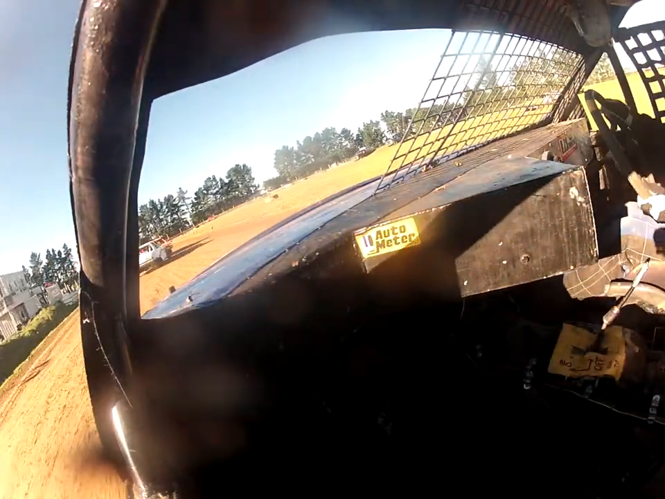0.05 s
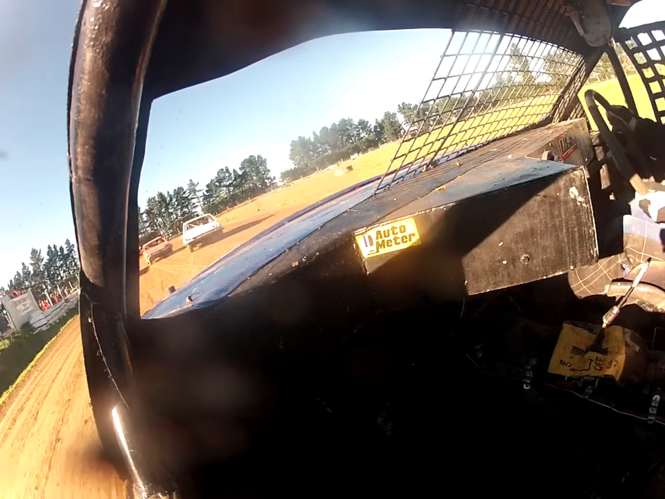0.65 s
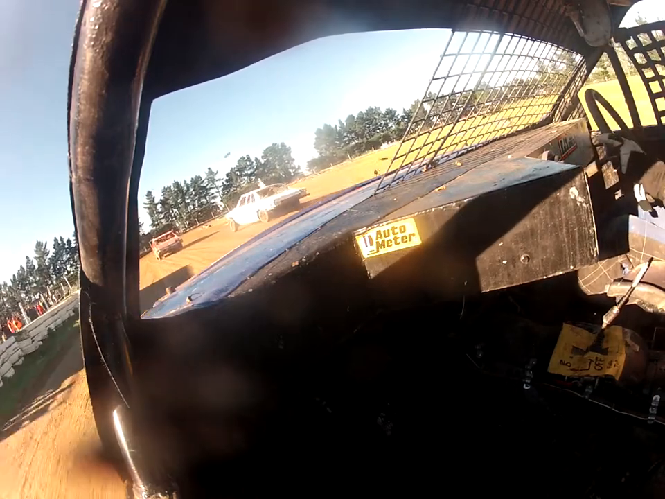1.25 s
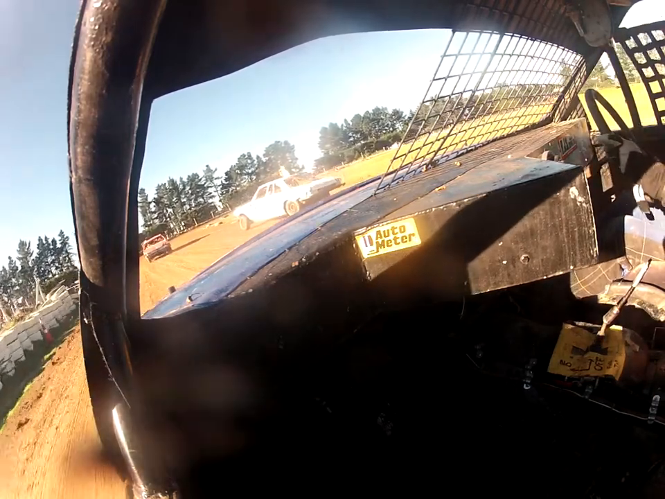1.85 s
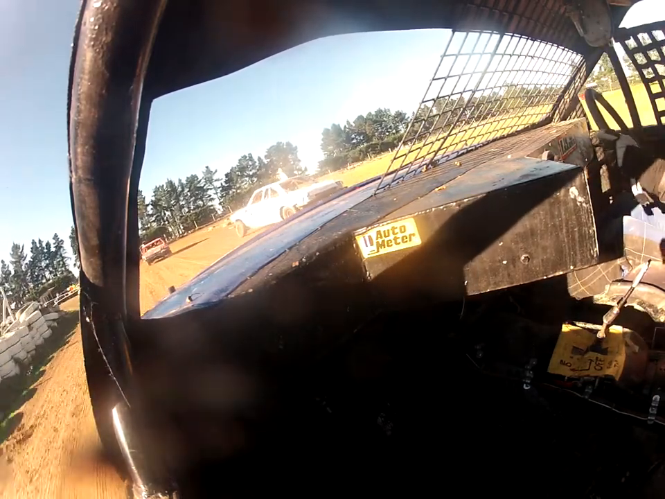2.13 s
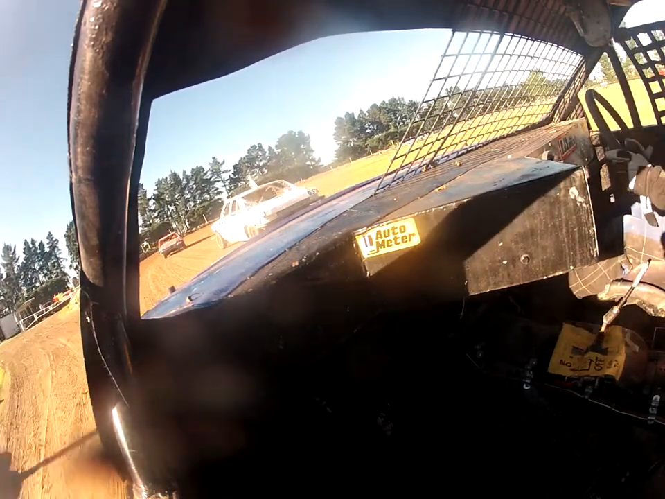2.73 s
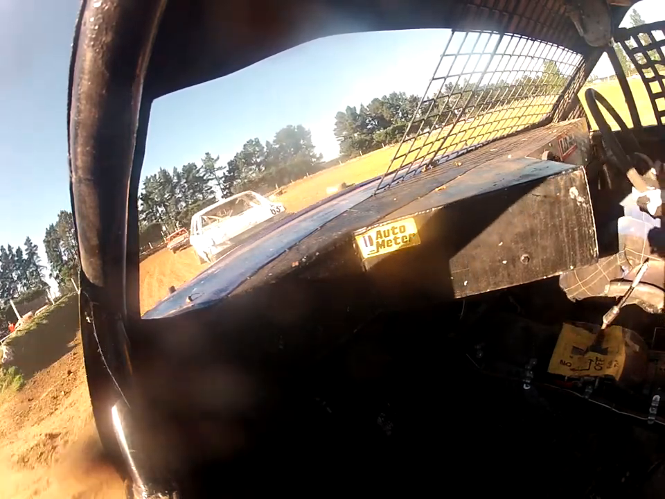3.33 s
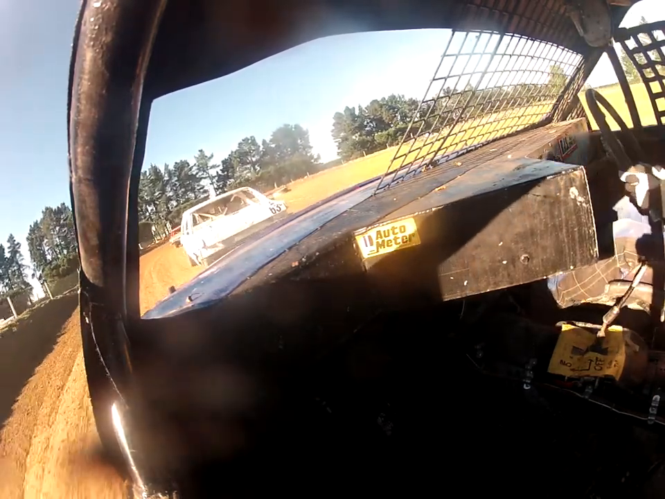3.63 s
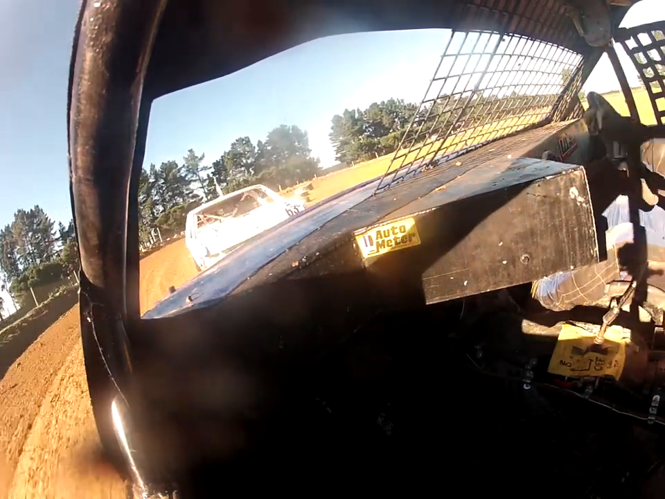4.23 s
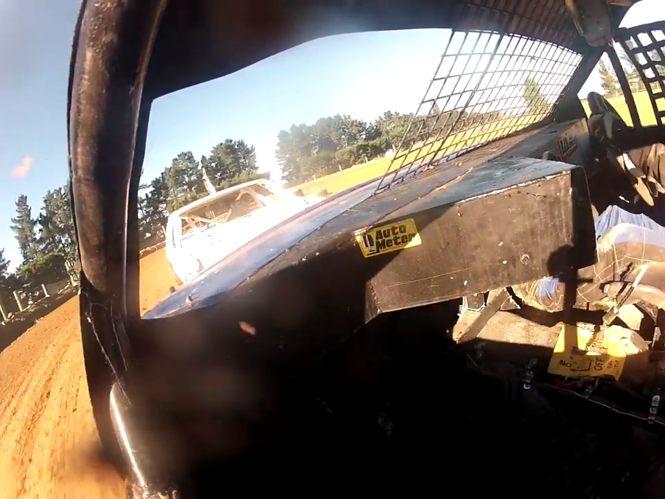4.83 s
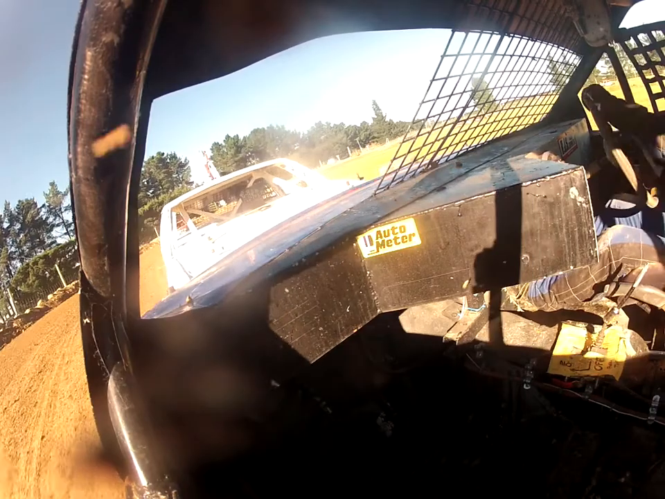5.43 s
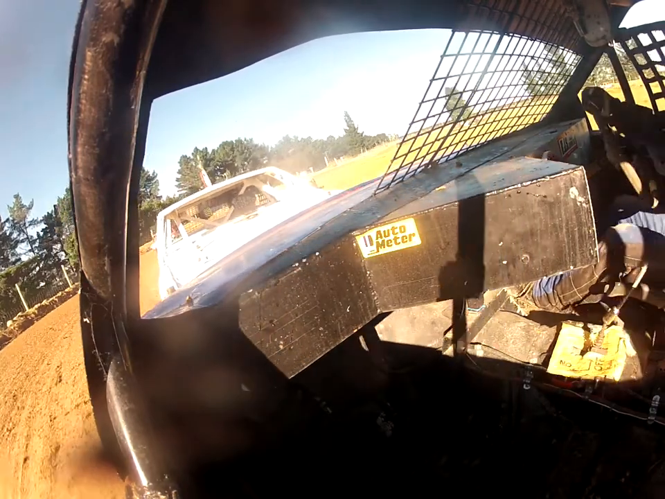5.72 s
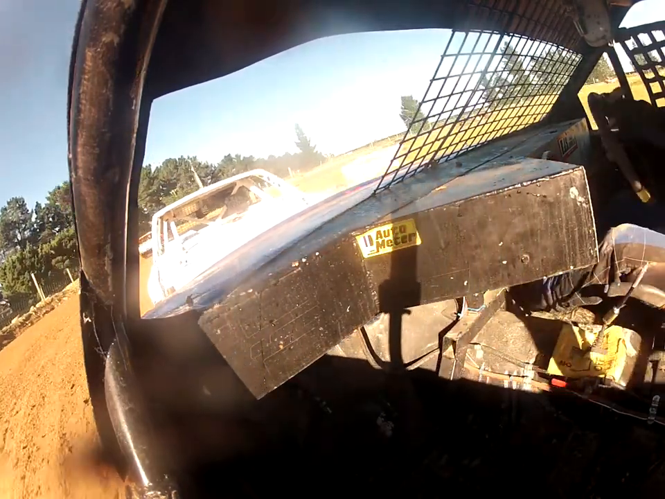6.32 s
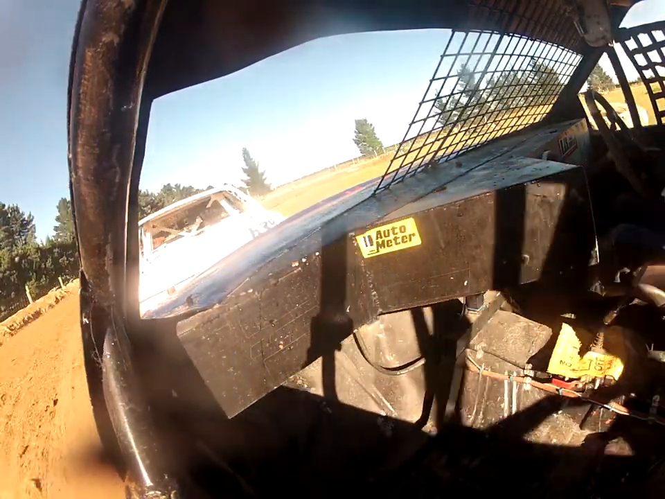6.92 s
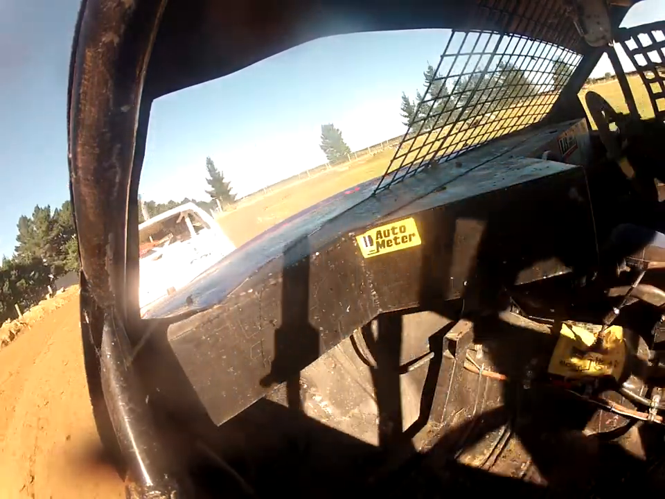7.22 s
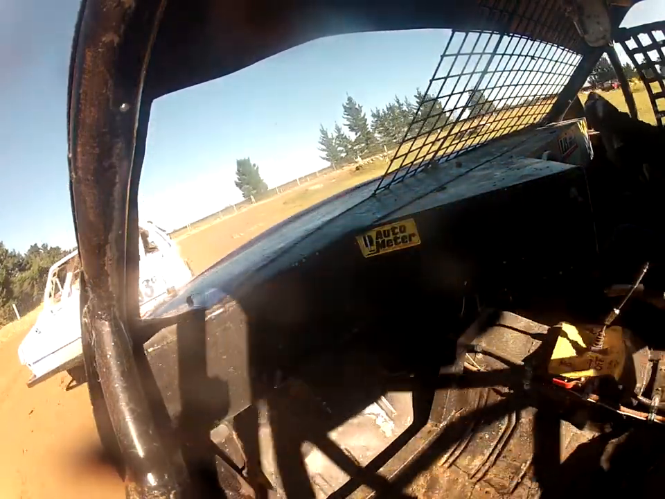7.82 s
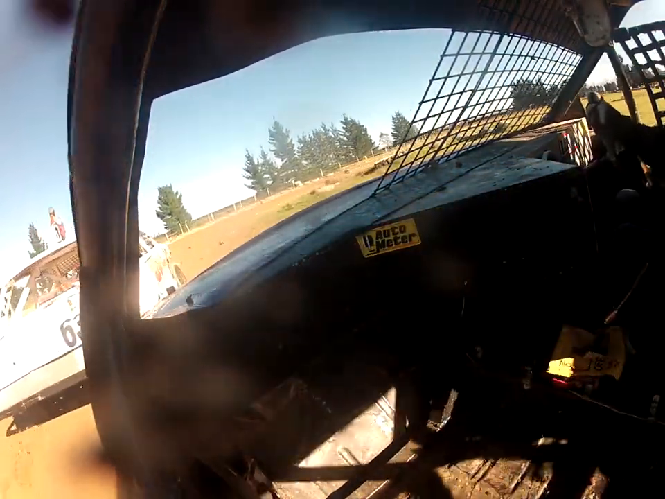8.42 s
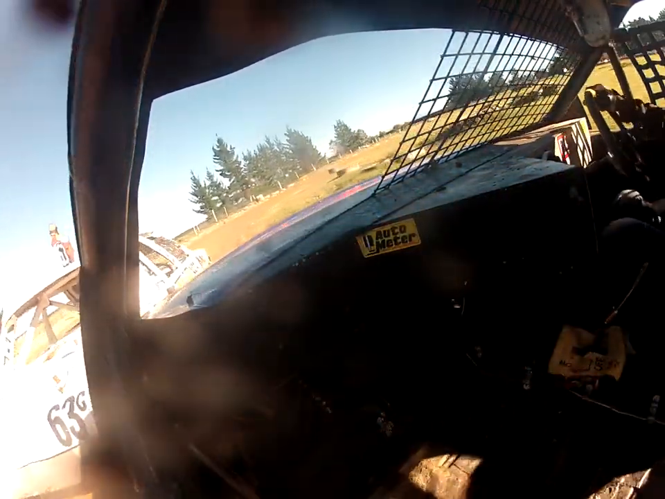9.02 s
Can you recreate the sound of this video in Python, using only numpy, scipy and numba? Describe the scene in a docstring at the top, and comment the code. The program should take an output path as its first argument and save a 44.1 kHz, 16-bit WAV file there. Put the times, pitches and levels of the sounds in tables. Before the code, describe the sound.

A six-cylinder race car engine roars inside a bare metal cab on a dirt track, surging and sagging with the throttle. The body rumbles, a loose panel drones and grit patters over a mechanical rasp. Flung stones crack right against the camera housing in clusters, the loud ones briefly ducking the sound. Near the end the revs fall and another car's rough note briefly swells in.

```python
"""Inside the bare cab of a six-cylinder race car lapping a dirt track; two microphone ports on a camera
in a closed housing. The engine surges and sags with the throttle; its firing note booms in the cab
and the sheet metal drones near 400 Hz. Right at the microphone, flung stones crack against the housing;
after the loud ones the camera's gain ducks and creeps back. At the end another car draws alongside."""
import sys
import numpy as np
from scipy import signal
from scipy.fft import rfft, irfft, next_fast_len
from scipy.io import wavfile
from scipy.ndimage import uniform_filter1d, minimum_filter1d, map_coordinates
from numba import njit

SR = 44100
rng = np.random.default_rng(int(sys.argv[2]) if len(sys.argv) > 2 else 0)


def file_out(sig):
    """Save sig as 16-bit WAV at sys.argv[1]."""
    # one column per channel
    cols = np.atleast_2d(sig).T
    # limit, then scale
    lim = np.clip(cols, -1, 1)
    pcm = np.round(lim * 32767).astype(np.int16)
    wavfile.write(sys.argv[1], SR, pcm)


N = 403956
TIME = np.arange(N) / SR
CYLINDERS = 6

# crankshaft speed: time_s, turns_per_s
CRANK_SPEED = [(0, 77.2), (.7, 77.8), (.88, 68.5), (1.15, 70), (1.38, 72.5), (1.55, 65.5), (1.9, 61),
               (2.25, 61.3), (2.45, 66.2), (2.6, 62.8), (2.75, 66.8), (2.95, 67), (3.4, 75), (3.55, 65.5),
               (3.8, 64), (4.1, 65), (4.22, 68), (4.45, 63.8), (5, 60), (5.25, 59), (6, 50.5), (6.3, 53),
               (7, 54.2), (7.82, 68), (8.1, 61.5), (8.38, 61), (8.7, 44), (8.85, 41.5), (8.97, 34),
               (9.16, 36)]
# unevenness of the firings: time_s, scatter (0-1), extra_strength of the loudest cylinder
COMBUSTION = [(0, .19, 1.1), (.65, .24, 1.1), (.9, .5, .3), (1.6, .4, .1), (3.2, .5, .2), (5.4, .45, .2),
              (6.4, .27, .1), (7.8, .2, .1), (9.16, .35, .2)]
# tone of a hit on the housing: frequency_hz, level_db
HOUSING_HIT = [(60, -40), (300, 0), (800, -2.5), (1300, 0), (1900, 8.5), (2700, 0.5), (3400, 0),
               (5000, -18.5), (7500, -14), (10200, -3), (12000, -32), (14000, -20), (16000, 9.5)]


def from_db(db):
    """Decibels to gain."""
    return 10 ** (np.asarray(db) / 20)


def rms_one(x):
    """Scale to unit rms."""
    return x / np.sqrt(np.mean(x ** 2) + 1e-20)


def in_time(rows):
    """Each column of a curve, at every sample."""
    time_s, *columns = np.transpose(rows)
    return [np.interp(TIME, time_s, column) for column in columns]


def drift(rate_hz):
    """Smooth random wandering with spread 1."""
    knots = rng.standard_normal(4000)
    coarse = map_coordinates(knots, [TIME[::20] * rate_hz * 2], order=3, mode="wrap")
    return rms_one(coarse).repeat(20)[:N]


def colour(x, spectrum):
    """Minimum-phase filter with the given (Hz, dB) shape, falling away beyond its ends."""
    size = 2 * next_fast_len(len(x) // 2 + 4096)
    hz, db = np.transpose(spectrum)
    octave = np.log2(np.maximum(np.fft.rfftfreq(size, 1 / SR), 1))
    outside = abs(octave - np.clip(octave, np.log2(hz[0]), np.log2(hz[-1])))
    shape_db = np.interp(octave, np.log2(hz), db) - 20 * np.minimum(outside, 2)
    cepstrum = irfft(np.log(from_db(shape_db)))
    cepstrum[1:size // 2] *= 2
    cepstrum[size // 2 + 1:] = 0
    return irfft(rfft(x, size) * np.exp(rfft(cepstrum)))[:len(x)]


def resonate(x, modes):
    """Lift a narrow band at each resonance."""
    for hz, width_hz, db in modes:
        x = x + (from_db(db) - 1) * signal.lfilter(*signal.iirpeak(hz, hz / width_hz, SR), x)
    return x


def steady(x, low_hz, high_hz, span_s):
    """Scale so that the running level of one band is 1."""
    band = signal.sosfilt(signal.butter(2, [low_hz, high_hz], "band", fs=SR, output="sos"), x)
    size = int(span_s * SR)
    power = uniform_filter1d(uniform_filter1d(band ** 2, size), size)
    power[:size] = power[size]   # a resonance needs a moment to build up
    return x / np.sqrt(power + 1e-20)


def diffuse_noise():
    """The cab noise that differs between the two microphone ports."""
    # its tone: frequency_hz, level_db
    spectrum = [(25, 16), (190, 12), (400, 15.5), (670, -3), (850, -6), (1200, -8), (2150, 1.5),
                (2700, -15), (3350, -16.5), (6000, -28), (10000, -16), (15000, -19)]
    return rms_one(colour(rng.standard_normal(N), spectrum))


def rival_car(wobble, whine_ratio, whine_db, swell_s):
    """Outside, another car closes in: a rough rising note, with a whine swelling above it."""
    # its approach: time_s, pitch_hz, level_db
    approach = [(0, 395, -90), (8.3, 434, -58), (8.8, 426.3, -41), (9.16, 438, -28)]
    hz, db = in_time(approach)
    phase = 2 * np.pi * np.cumsum(hz * (1 + wobble * drift(40))) / SR
    closeness = np.exp((TIME - TIME[-1]) / swell_s)
    whine = from_db(whine_db) * closeness * np.sin(whine_ratio * phase)
    return (from_db(db) * np.sin(phase) + whine) * from_db(2.5 * drift(30))


def rut_jolts():
    """Each rut gives one short swell to the body rumble, the panel drone and the spray of dirt."""
    # ruts in the track: centre_s, half_length_s, rumble_db, drone_db, spray_db
    ruts = [(1.727, 0.15, -28, -45, -37), (2.214, .04, -33, -25, -58), (2.42, 0.071, -25, -23, -44),
            (3.014, 0.09, -33, -46, -50), (3.833, 0.19, -39, -35, -40), (4.7, 0.052, -31, -24, -48),
            (5.473, 0.043, -26, -12, -36), (6.067, 0.081, -33, -57, -40), (6.955, 0.027, -40, -17, -53),
            (7.144, 0.024, -38, -13, -57), (8.91, 0.016, -36, -14.5, -43),
            (8.997, 0.055, -23.5, -44, -29.5)]
    return sum(from_db(levels_db)[:, None] * np.exp(-((TIME - centre_s) / half_s) ** 2)
               for centre_s, half_s, *levels_db in ruts)


def body_rumble():
    """The car's body shakes all around the microphone: low, even noise."""
    # its tone: frequency_hz, level_db
    spectrum = [(20, -47), (35, -7.5), (50, -2), (70, -6.5), (100, 3.5), (140, -10.5), (180, 3.5),
                (260, -39.5)]
    return steady(colour(rng.standard_normal(N), spectrum), 64, 103, span_s=0.36)


def grit(per_s, spread_db):
    """Crumbs of dirt patter on the housing in random flurries."""
    sizes = from_db(spread_db * np.minimum(rng.exponential(1, N), 3)) * rng.choice([-1, 1], N)
    hits = rng.random(N) < per_s * from_db(4 * drift(5)) / SR
    return rms_one(colour(sizes * hits, HOUSING_HIT))


def clatter(turns):
    """Flickering mechanical noise that swells slightly with every crank turn and every firing."""
    # clatter heard through the housing: frequency_hz, level_db
    rasp_tone = [(700, -23), (900, -3), (1150, -3), (1400, -1.5), (1650, -4.5), (2080, 4.5), (2400, 0),
                 (2680, -10), (3250, -5), (3800, -13), (4500, -19), (5400, -21), (6000, -37), (7000, -43)]
    # fine hiss at the top of the housing's response: frequency_hz, level_db
    hiss_tone = [(5800, -29), (6600, -8.5), (7600, -9), (8750, 0), (9300, -4.5), (9900, 6), (10500, -7),
                 (11000, -6), (13200, -14), (14100, 4), (14800, -17), (15400, -3.5)]
    flicker = from_db(1.46 * drift(30) + 1.2 * drift(7))
    throb = np.cos(2 * np.pi * turns) + np.cos(np.pi * CYLINDERS * turns)
    rasp = colour(rng.standard_normal(N) * (1 + 0.046 * throb) * flicker, rasp_tone)
    hiss = colour(rng.standard_normal(N) * (1 + 0.028 * throb) * flicker, hiss_tone)
    return rms_one(rasp) + from_db(-9.5) * rms_one(hiss)


def panel_drone(gas, jolt, pitch_hz, width_hz, waver_db):
    """A loose panel howls at its own pitch, shaken by whichever engine order is nearest."""
    # strength of the drone: time_s, relative_db
    strength = [(0, -25.5), (.45, -19.5), (.6, -29), (1, -26.5), (1.9, -26.5), (2.4, -25), (2.8, -18.5),
                (3.1, -23), (3.7, -32.5), (4.3, -25.5), (4.9, -32.5), (5.8, -26.5), (6.35, -25.5),
                (6.48, -20), (7.3, -26), (7.8, -16.5), (8.15, -28.5), (9.16, -23)]
    drone_db, = in_time(strength)
    b, a = signal.iirpeak(pitch_hz, pitch_hz / width_hz, SR)
    howl = signal.lfilter(b, a, signal.lfilter(b, a, gas))   # twice, for steep flanks
    level = from_db(drone_db + waver_db * drift(6)) + jolt
    return level * steady(howl, 300, 520, span_s=.035)


def stones(tail_db, tail_t60_s, thud_hz, thud_t60_s, hardness, ping_width_hz, ping_db):
    """Each stone on the housing gives a brief crack with its own ping, a faint rattle and a low thud."""
    # stones and clods: start_s, relative_db, rise_s, thud_db (against the crack), ping_hz
    hits = [(0.947, -12.5, 0.0022, -26, 2390), (1.028, -3.5, 0.0016, -25, 1860),
            (1.073, -0.5, 0.0014, -12, 1840), (1.2222, 5.5, 0.0024, -10, 1930), (2.83, 2, 0.001, -13, 1560),
            (4.0089, -3.5, 0.0012, -12, 2100), (4.2173, -8, 0.00063, -28, 1920),
            (4.58, -13.5, 0.0011, -20, 1990), (4.7399, -4, 0.0033, -24, 2260),
            (5.232, -2, 0.0017, -8, 1650), (5.404, -13.5, 0.0045, -18, 2910),
            (5.497, -11, 0.0023, -22, 2160), (5.5508, 0.5, 0.0013, -17, 1600),
            (5.879, -19.5, 0.006, -26, 3210), (6.143, -15, 0.0021, -24, 2250),
            (6.2412, -1, 0.0012, -18, 2080), (7.866, -17.5, 0.0049, -22, 2210),
            (8.708, -17, 0.0045, -22, 2150), (8.914, -19, 0.004, -22, 3260),
            (8.963, -13, 0.0031, -24, 1840)]
    out, t = np.zeros(N + SR), np.arange(SR // 10) / SR
    thud = np.sin(2 * np.pi * thud_hz * t) * from_db(-60 * t / thud_t60_s)
    tail = from_db(tail_db - 60 * t / tail_t60_s)
    for start_s, db, rise_s, thud_db, ping_hz in hits:
        contact = t / rise_s * np.exp(1 - t / rise_s)
        crack = colour(rng.standard_normal(len(t)) * (contact + tail), HOUSING_HIT)
        crack = resonate(crack, [(ping_hz, ping_width_hz, ping_db)])
        cutoff_hz = np.clip(hardness / rise_s, 500, .4 * SR)   # soft clods burst slowly and sound duller
        crack = signal.lfilter(*signal.butter(1, cutoff_hz, fs=SR), crack)
        start = int(start_s * SR)
        out[start:start + len(t)] += from_db(db) * (crack / abs(crack).max() - from_db(thud_db) * thud)
    return out[:N]


def crank_turns(wobble):
    """Turns of the crankshaft so far; the wheels grip and slip, so the speed wobbles."""
    speed, = in_time(CRANK_SPEED)
    return np.cumsum(speed * (1 + wobble * drift(12))) / SR


def engine_order(turns, order, flutter_db):
    """A clean note at a multiple of the crank speed, fluttering a little in strength."""
    return np.sqrt(2) * np.sin(2 * np.pi * order * turns) * from_db(flutter_db * drift(22))


def crank_shake(turns, flutter_db, onset_width_turns_per_s):
    """Above a certain speed each order of the crank starts to shake the car."""
    # notes of the hard-revving engine: crank_multiple, relative_db, onset_turns_per_s
    orders = [(1, -4.5, 65.4), (2, -4, 71.6), (3, -10.5, 73.4), (3.5, -10, 78.4), (5, -8, 77.6)]
    speed, = in_time(CRANK_SPEED)
    out = 0
    for order, db, onset in orders:
        share = .5 + .5 * np.tanh(.5 * (speed - onset) / onset_width_turns_per_s)
        out = out + from_db(db) * share * engine_order(turns, order, flutter_db)
    return out


def exhaust_gas(turns, base_strength, turn_accent, turbulence):
    """Three pulses a turn in turbulent gas; unequal cylinders add lines between the firing harmonics."""
    scatter, lead = in_time(COMBUSTION)
    fired = np.flatnonzero(np.diff(np.floor(turns * CYLINDERS / 2)))
    cylinder = np.arange(len(fired)) % CYLINDERS
    strength_error, timing_error = scatter[fired] * rng.standard_normal((len(fired), 2)).T
    accent = turn_accent * (cylinder % (CYLINDERS // 2) == 0) + lead[fired] * (cylinder == 0)
    late = (0.00027 * timing_error * SR).astype(int)
    pulses = np.zeros(N)
    pulses[np.clip(fired + late, 0, N - 1)] = base_strength + accent + strength_error
    return pulses + turbulence * scatter * rng.standard_normal(N)


def exhaust_roar(gas, echo):
    """The exhaust from inside the cab: blurred by echoes between the panels, coloured by the body."""
    # echo paths between the panels: delay_s
    echo_delays = [.0023, .0037, .0059]
    # exhaust heard through the body: frequency_hz, level_db
    through_body = [(90, -33), (150, -1), (200, 2.5), (250, -4.5), (320, 0), (385, 4), (440, -3.5),
                    (490, -6.5), (570, -6.5), (640, -11.5), (730, -24), (850, -14), (1100, -28),
                    (1800, -20)]
    # resonance of the cab: pitch_hz, width_hz, lift_db
    cab_modes = [(878.5, 59, 11)]
    for delay_s in echo_delays:
        allpass = np.r_[1, np.zeros(int(delay_s * SR)), -echo]
        gas = signal.lfilter(allpass[::-1], allpass, gas)
    in_cab = resonate(colour(gas, through_body), cab_modes)
    return steady(in_cab, 200, 516, span_s=0.25)


def cab_boom(turns, resonance_hz, width_hz, flutter_db):
    """The firing note swells as its pitch passes through the cab's resonance."""
    # relative strength of the firing note: time_s, in_tune_db, off_tune_db
    strength = [(0, -15, -44.5), (1.6, -15, -36), (2.3, -13.5, -34), (2.7, -23, -36.5), (3.7, -16, -30),
                (4.1, -20.5, -40), (4.6, -13, -57), (4.9, -13.5, -47), (5.2, -15, -44.5), (6.1, -14, -35),
                (7.55, -32, -58), (8.05, -21.5, -52), (8.4, -20, -38), (8.95, -18, -30.5), (9.16, -18, -45)]
    in_tune_db, off_tune_db = in_time(strength)
    speed, = in_time(CRANK_SPEED)
    order = CYLINDERS / 2
    in_tune = np.exp(-((order * speed - resonance_hz) / width_hz) ** 2)
    return (from_db(in_tune_db) * in_tune + from_db(off_tune_db)) * engine_order(turns, order, flutter_db)


def scene():
    """Engine, body, the other car and stones, nearly the same at both microphone ports."""
    # how hard the car is driven, as relative levels: time_s, roar_db, rasp_db
    drive = [(0, -30.5, -32.5), (.6, -30.5, -31.5), (.95, -31.5, -34.5), (1.4, -32.5, -34),
             (1.65, -29, -34), (2.3, -28.5, -29), (2.6, -32, -34.5), (3.25, -29, -30.5), (4.35, -33, -36.5),
             (4.6, -29.5, -29), (5, -30.5, -32), (5.45, -26, -32), (5.65, -35, -37), (6.1, -30.5, -35.5),
             (6.3, -30.5, -35.5), (7.2, -33.5, -38.5), (7.4, -28, -34), (7.97, -35, -37), (8.2, -26.5, -31),
             (8.6, -32, -34.5), (9.16, -32.5, -36.5)]
    roar_db, rasp_db = in_time(drive)
    body_jolt, panel_jolt, spray = rut_jolts()
    turns = crank_turns(wobble=0.00409)
    gas = exhaust_gas(turns, base_strength=0.059, turn_accent=0.2, turbulence=0.071)
    shake = from_db(roar_db) * crank_shake(turns, flutter_db=1.1, onset_width_turns_per_s=0.7)
    boom = from_db(-3) * cab_boom(turns, resonance_hz=188, width_hz=8.75, flutter_db=2.5)
    # the body rumbles in step with the exhaust; a jolt also shakes more exhaust noise through it
    rumble = from_db(-10) * (from_db(roar_db - 6.5) + body_jolt) * body_rumble()
    roar = (from_db(roar_db + 1.5) + 0.22 * body_jolt) * exhaust_roar(gas, echo=0.58)
    drone = from_db(-5) * panel_drone(gas, panel_jolt, pitch_hz=399, width_hz=32, waver_db=2.83)
    rasp = (from_db(rasp_db) + spray) * (clatter(turns) + from_db(-14.5) * grit(per_s=65, spread_db=4.5))
    rival = rival_car(wobble=0.026, whine_ratio=2.21, whine_db=-30, swell_s=0.092)
    cracks = from_db(0.5) * stones(tail_db=-23, tail_t60_s=0.052, thud_hz=112, thud_t60_s=0.024,
                                   hardness=56, ping_width_hz=480, ping_db=5.5)
    mid = shake + boom + rumble + roar + drone + rasp + rival + cracks
    side = from_db(roar_db - 24.5) * diffuse_noise()
    return np.array([mid + side, mid - side])


@njit
def gain_cut(excess_db, attack, release):
    """The cut in dB rushes up to any excess level and relaxes exponentially."""
    cut, now = np.zeros(len(excess_db)), 0.
    for i in range(len(excess_db)):
        now += (excess_db[i] - now) * (attack if excess_db[i] > now else release)
        cut[i] = now
    return cut


def limiter(x, threshold_db, hold_s, attack_s, release_s, ahead_s):
    """The camera's gain control follows the held peak level, looking a moment ahead."""
    size = int(hold_s * SR) // 2 * 2 + 1
    peak = -minimum_filter1d(-abs(x).max(axis=0), size, origin=size // 2)
    excess_db = np.maximum(20 * np.log10(peak + 1e-9) - threshold_db, 0)
    cut_db = gain_cut(excess_db, 1 / (attack_s * SR), 1 / (release_s * SR))
    return x * from_db(-np.interp(TIME + ahead_s, TIME, cut_db))


def overload(x, ceiling):
    """Peaks that outrun the gain control are flattened."""
    return x / (1 + (x / ceiling) ** 6) ** (1 / 6)


def thin_whine(x, centre_hz, gain_db):
    """A thin, high whine follows the engine's low notes."""
    low_notes = signal.sosfilt(signal.butter(2, [180, 900], "band", fs=SR, output="sos"), x)
    return from_db(gain_db) * low_notes * np.cos(2 * np.pi * centre_hz * TIME)


def record(dry):
    """The camera ducks after loud cracks, flattens their peaks, adds a thin whine and cuts the top."""
    x = limiter(dry, threshold_db=-11, hold_s=0.028, attack_s=0.0023, release_s=0.091, ahead_s=0.00034)
    x = overload(x, ceiling=.29)
    x = x + thin_whine(x, centre_hz=12000, gain_db=-24)
    return signal.sosfilt(signal.ellip(12, .2, 90, 15450, fs=SR, output="sos"), x)


dry = scene()
out = record(dry)
file_out(out)
```